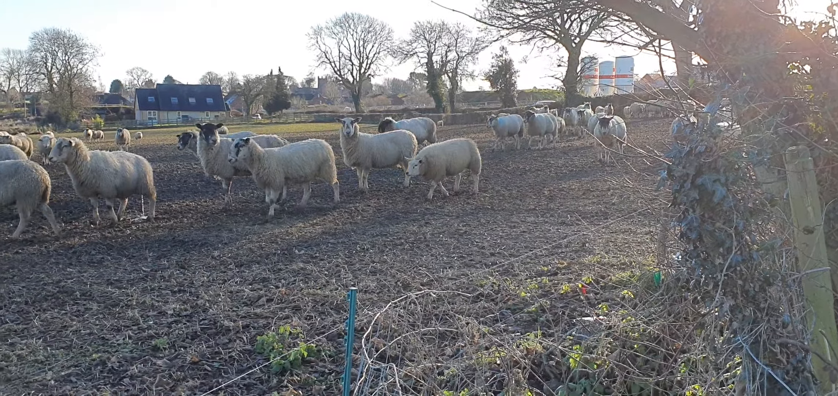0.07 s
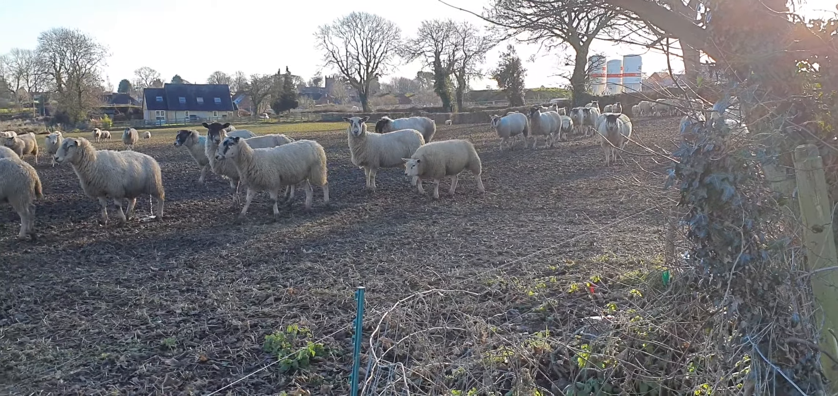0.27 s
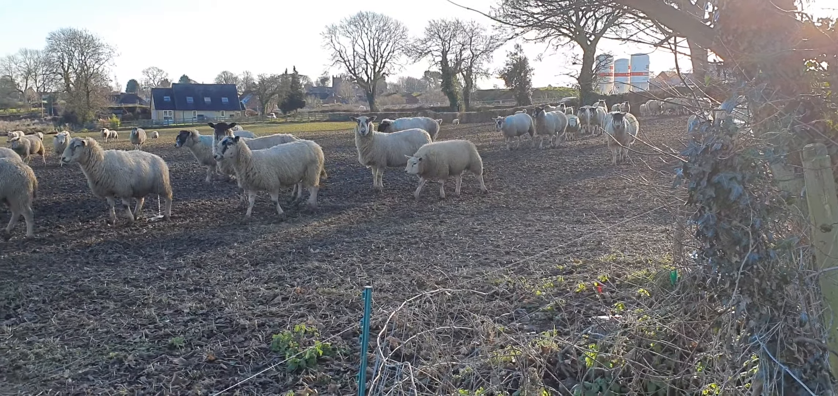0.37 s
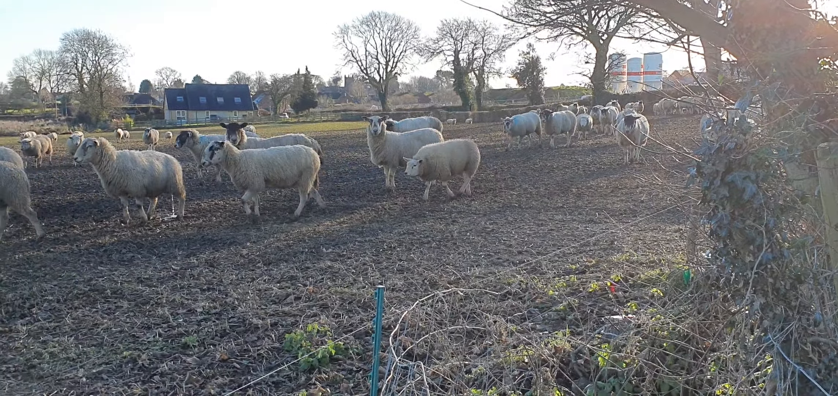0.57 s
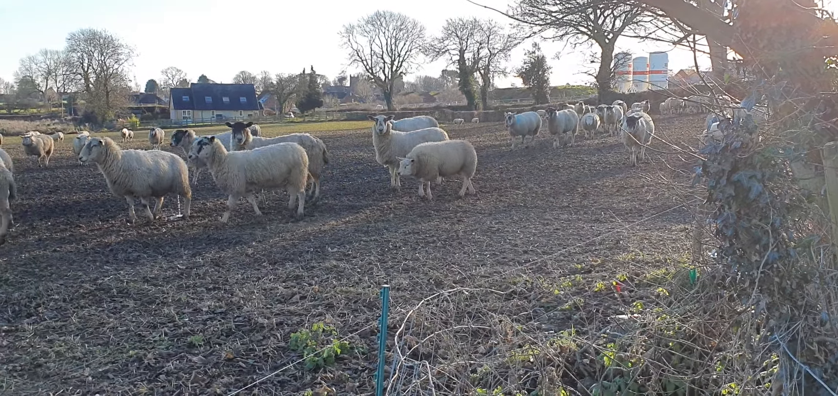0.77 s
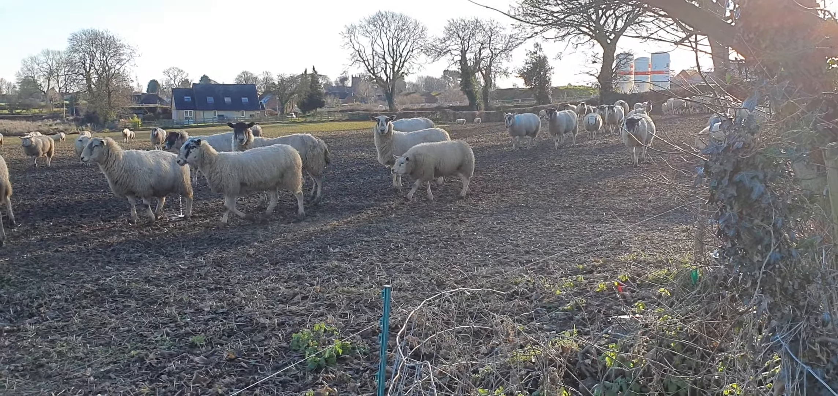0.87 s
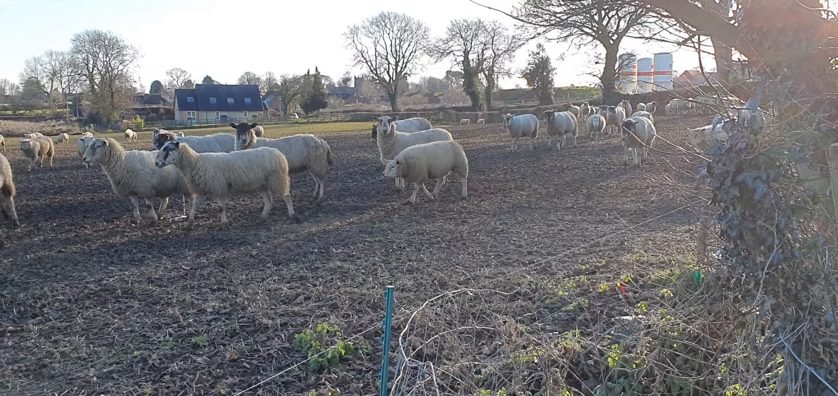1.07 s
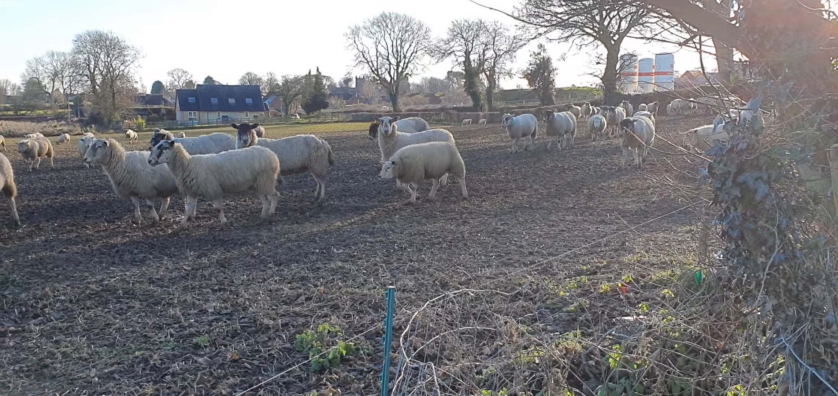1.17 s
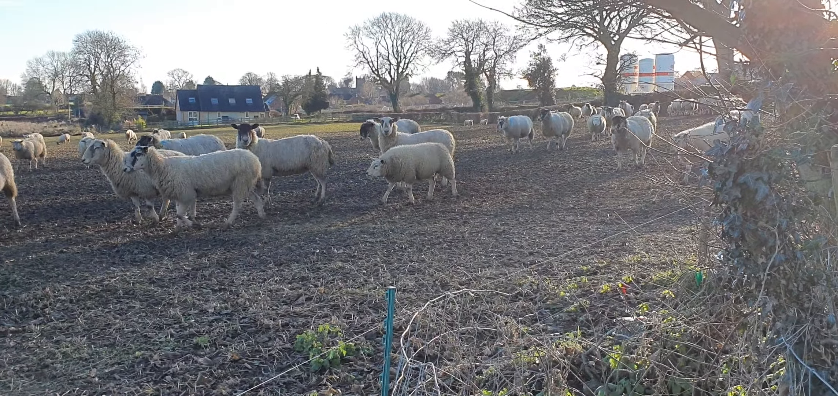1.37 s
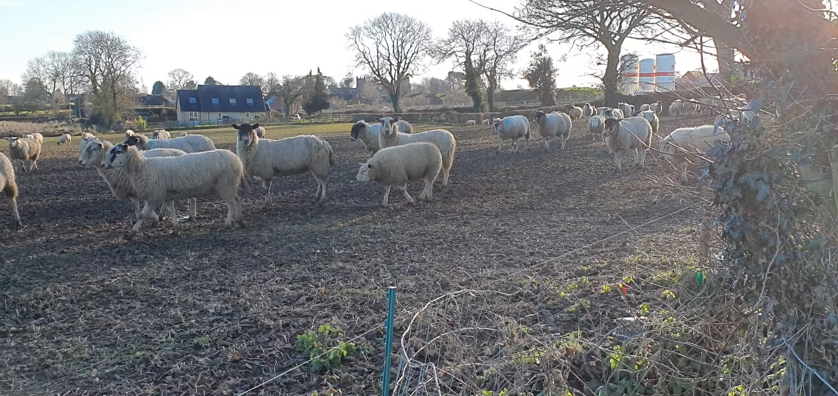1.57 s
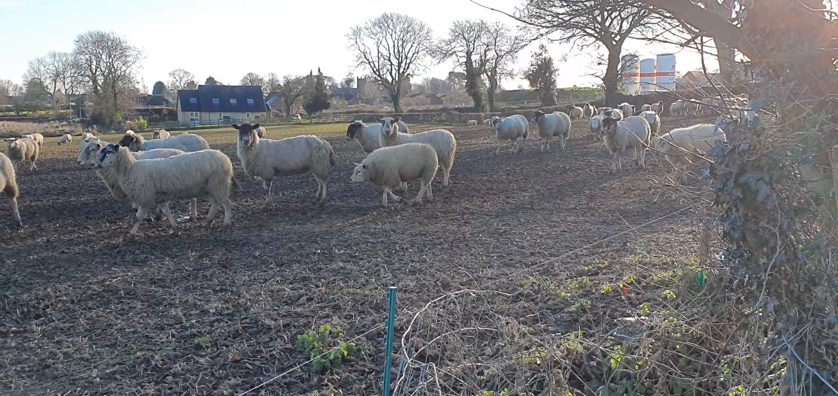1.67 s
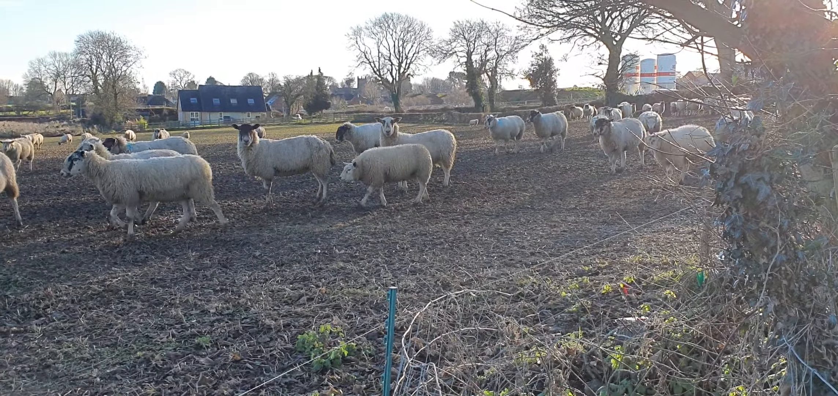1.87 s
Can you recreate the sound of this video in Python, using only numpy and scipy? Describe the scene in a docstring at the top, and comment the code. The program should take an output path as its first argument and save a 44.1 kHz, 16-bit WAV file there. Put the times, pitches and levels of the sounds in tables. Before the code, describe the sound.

A sheep bleats once in an open field, after some wind. From the start, gusts rumble on the microphone, strongest on the right with a few thumps between 0.3 and 0.7 seconds. At about 1.2 seconds the sheep hums quietly, opening at 1.4 into a buzzy bleat, briefly hoarse, held until about 1.9. Lighter gusts, faint outdoor hiss and a few tiny ticks sit underneath.

```python
"""In an open field, a sheep hums with its mouth shut, then opens it into one long, buzzy bleat.
Pulses from its voice box ring its throat and mouth, and the tone changes as the mouth opens.
From the start, gusts rumble on the microphone's two openings (ports), left and right in turn,
over a faint outdoor hiss, a dull distant wash and a few tiny ticks."""
import sys
import numpy as np
from scipy import signal
from scipy.fft import rfft, irfft, next_fast_len
from scipy.io import wavfile
from scipy.ndimage import uniform_filter1d

SR = 44100
rng = np.random.default_rng(int(sys.argv[2]) if len(sys.argv) > 2 else 0)


def wav_record(signal):
    """Record a signal, one row per channel, as 16-bit PCM in the file named by sys.argv[1]."""
    frames = np.transpose(np.atleast_2d(signal))
    bounded = np.clip(frames, -1, 1)
    # unit amplitude maps onto the largest positive 16-bit level
    quanta = np.round(bounded * 32767).astype(np.int16)
    wavfile.write(sys.argv[1], SR, quanta)


N = 83790
T = np.arange(N) / SR

# Strength of the wind at each port: time_s, level_db
GUSTS_LEFT = [(0, -34), (0.06, -55), (0.28, -36.5), (0.38, -30), (0.52, -29.5), (0.6, -39), (0.73, -32.5),
              (0.88, -37.5), (1.02, -44), (1.11, -37.5), (1.19, -48.5), (1.55, -45), (1.59, -33),
              (1.64, -44), (1.72, -40.5), (1.9, -51)]
GUSTS_RIGHT = [(0, -45), (0.15, -47), (0.22, -37), (0.245, -27), (0.3, -23.5), (0.385, -21.5),
               (0.425, -22.5), (0.46, -32.5), (0.482, -24), (0.54, -21), (0.59, -36.5), (0.64, -26),
               (0.69, -27), (0.73, -35), (0.92, -43.5), (1.0, -51.5), (1.4, -56), (1.5, -42), (1.59, -31),
               (1.66, -49), (1.9, -59.5)]
# Tone of the large and the small swirls of air: frequency_hz, gain_db
LARGE_SWIRL_TONE = [(10, -11.5), (25, -5.5), (45, -1), (66, 7), (100, -5.5), (150, -13.5), (250, -31),
                    (400, -40), (800, -63), (2000, -100)]
SMALL_SWIRL_TONE = [(50, -32), (130, 5), (250, 1.5), (370, -7.5), (480, -18.5), (650, -27), (900, -38),
                    (2000, -73), (5000, -100)]
# Tone of the outdoor hiss: frequency_hz, left_db, right_db
HISS_TONE = [(162, -2.5, -3), (354, -21.5, -14), (480, -14.5, -25.5), (846, -18.5, -15.5), (1050, -23, -38),
             (1620, -21.5, -18), (2110, -20.5, -20), (2820, -24, -38.5), (3240, -23.5, -29),
             (4740, -30, -28), (7270, -22.5, -42.5), (8210, -30, -43.5), (9070, -46, -65),
             (12050, -34.5, -51.5), (15500, -42, -64.5)]
# Tone of the distant wash: frequency_hz, gain_db
WASH_TONE = [(100, -7), (200, 5.5), (350, -0.5), (480, -9), (800, -10), (1300, -8), (2100, -10.5),
             (2700, -29.5), (6000, -48.5)]
# Loudness of the hiss and of the wash: time_s, level_db
HISS_LOUDNESS = [(0, -54), (.3, -55.5), (.6, -59), (.85, -55.5), (1.1, -59), (1.55, -52.5), (1.9, -49.5)]
WASH_LOUDNESS = [(0, -61), (.6, -64.5), (1, -58.5), (1.35, -57), (1.6, -59)]
# Ticks and scuffs nearby: start_s, level_db, centre_hz, decay_s
TICK_EVENTS = [(0.018, -58.5, 4700, 0.017), (.762, -67, 9000, 0.0058), (0.862, -61, 3600, 0.035),
               (1.005, -70, 13500, .003), (1.672, -52.5, 5370, 0.0029)]
# Hard thumps of wind: centre_s, peak_db, half_width_s
WIND_THUMPS = [(0.381, -20, 0.00088), (.405, -10, 0.0011), (.484, -17, 0.0015), (0.533, -8, 0.0036),
               (0.688, -21.5, 0.0022), (0.702, -19, 0.0022), (1.593, -24, 0.0025)]

# The sheep's note, first humming, then calling: time_s, pitch_hz
HUM_NOTE = [(1.2, 154.7), (1.39, 174.7)]
CALL_NOTE = [(1.41, 180), (1.432, 184), (1.465, 179), (1.515, 177.8), (1.57, 178.5), (1.62, 184.4),
             (1.645, 185.6), (1.674, 184.1), (1.712, 180.3), (1.752, 183.2), (1.782, 179.8), (1.816, 180),
             (1.9, 172)]
# How hoarse the voice is: time_s, roughness (0 to 1)
HOARSENESS = [(1.39, .7), (1.43, .36), (1.47, .33), (1.51, .12), (1.6, .07), (1.8, .09), (1.9, .14)]
# How hard the sheep pushes: time_s, level_db
VOICE_EFFORT = [(1.18, -78.5), (1.25, -67.5), (1.31, -60.5), (1.37, -58), (1.405, -61), (1.43, -49),
                (1.46, -48), (1.48, -50.5), (1.54, -42.5), (1.64, -40), (1.76, -40), (1.9, -43)]
# The mouth: time_s, opening (0 shut, 1 parting, 2 half open, 3 wide)
MOUTH_OPENING = [(1.405, 0), (1.43, 1), (1.53, 1), (1.62, 2), (1.77, 2.3), (1.79, 2.75), (1.85, 3)]
# How throat and mouth ring at each of those openings: frequency_hz, gain_db
SHUT_TONE = [(100, -22), (300, -17), (1000, -14), (1600, -11.5), (1850, 5.5), (2080, 1.5), (2450, -9.5),
             (2900, -2), (3290, -3.5), (3750, -29), (5700, -11), (6500, -34.5), (10000, -54)]
PARTING_TONE = [(180, -16), (360, -2.5), (540, 1.5), (720, -3), (950, -26), (1270, -6), (1420, -3),
                (1610, 8), (1790, -5), (1970, -2), (2250, -5), (2510, 11.5), (2720, 7), (2870, -12),
                (3070, 6.5), (3450, -36), (3750, -24), (4150, -24), (5900, -18.5), (7300, -30.5),
                (12000, -39)]
HALF_OPEN_TONE = [(180, -23.5), (365, -3), (550, -3), (735, -7), (930, -23), (1290, -6), (1470, -16.5),
                  (1660, 7), (1850, 3), (2210, -3), (2400, 9.5), (2580, 9.5), (2770, 2.5), (2950, 7.5),
                  (3130, -3), (3400, -16), (3750, -25), (4180, -11.5), (4500, -26.5), (4900, -10.5),
                  (5350, -42), (5850, -18), (6300, -43), (6750, -37), (9000, -44), (12000, -37),
                  (15000, -52)]
WIDE_TONE = [(180, -26), (360, -3), (530, -11.5), (705, 8.5), (900, -24), (1080, -13), (1250, -10.5),
             (1430, -2.5), (1600, 0.5), (1790, 7), (1970, -1.5), (2280, -11), (2500, 10), (2690, 8.5),
             (2870, -6), (3230, 2.5), (3450, -13), (3750, -40), (4100, -11), (4400, -26), (4950, -20),
             (6300, -23), (7250, -16.5), (9000, -73), (12000, -40), (15000, -63)]
# Boost of the high, brassy ring in the voice: time_s, gain_db
BRASS_BOOST = [(1.39, 2), (1.425, 10.5), (1.455, 0), (1.66, -3), (1.71, 1), (1.78, 1), (1.85, 1.5)]
# Echoes from a nearby tree and fence, then the field: delay_s, fade_s (to fall 60 dB), level_db
ECHOES = [(.0008, .035, -16), (.012, .3, -21)]
# The voice at one port against the other: frequency_hz, left_minus_right_db, left_phase_lead_rad
PORT_BALANCE = [(376, -8, 0), (516, 13.5, -0.2), (690, -1.5, -1.5), (880, -15.5, -2), (1230, 0, -0.6),
                (2150, -10.5, -2.15), (2407, -6.5, .5), (2614, 2, .5), (3020, -0.5, 1.33), (4130, 8, 1),
                (7000, 18, 1.5), (15000, 5.5, -1.5)]


def gain(db):
    """Turn decibels into a multiplier."""
    return 10 ** (np.asarray(db) / 20)


def unit(x):
    """Scale to an average (rms) level of 1."""
    return x / np.sqrt(np.mean(x ** 2))


def curve(rows):
    """Join (time_s, value) rows by straight lines."""
    return np.interp(T, *np.array(rows, float).T)


def noise():
    """White noise at level 1."""
    return rng.standard_normal(N)


def colour(x, tone):
    """Filter a sound through (frequency_hz, gain_db) points."""
    size = 2 * next_fast_len(N)
    hz, db = np.array(tone, float).T
    grid_hz = np.maximum(np.arange(size // 2 + 1) * SR / size, 1)
    grid_db = np.interp(np.log(grid_hz), np.log(hz), db)
    cepstrum = irfft(np.log(gain(grid_db)))
    # Folding this in half makes the filter ring only after a sound, never before.
    cepstrum[1:size // 2] *= 2
    cepstrum[size // 2 + 1:] = 0
    return irfft(rfft(x, size) * np.exp(rfft(cepstrum)))[:N]


def drift(rate_hz):
    """A smooth random wander, about 1 in size."""
    hold = int(SR / rate_hz)
    steps = noise()[np.arange(N) // hold]
    return unit(uniform_filter1d(uniform_filter1d(steps, hold), hold))


def steady(x, span_s):
    """Hold a noise near level 1 over every short span."""
    return x / np.sqrt(uniform_filter1d(x ** 2, int(span_s * SR)))


def wind(gusts):
    """Swirling air rumbles at one port; small swirls grow faster than large ones as a gust rises."""
    gust_db = curve(gusts)
    strong_wind_db, growth = -21.5, 0.91
    small_db = -6.5 + growth * (gust_db - strong_wind_db)
    large = gain(2) * steady(colour(noise(), LARGE_SWIRL_TONE), span_s=0.0465)
    small = gain(small_db) * steady(colour(noise(), SMALL_SWIRL_TONE), span_s=0.032)
    return gain(gust_db) * (large + small)


def outdoor_hiss():
    """A faint hiss that flickers slightly and is brighter on the left."""
    rows = np.array(HISS_TONE, float)
    flicker_db = 2
    ports = [colour(noise(), rows[:, [0, side]]) * gain(flicker_db * drift(rate_hz=18.44))
             for side in (1, 2)]
    return unit(np.array(ports)) * gain(curve(HISS_LOUDNESS))


def distant_wash():
    """Dull noise from the far countryside, partly the same at both ports."""
    shared = noise()
    ports = [unit(colour(shared + noise(), WASH_TONE)) for _ in range(2)]
    return np.array(ports) * gain(curve(WASH_LOUDNESS))


def ticks():
    """Dry ticks and scuffs: bursts of noise that die fast, about as loud on both sides."""
    out = np.zeros((2, N))
    spread, right_db = 2 ** 0.6, 0.5  # the band's shoulders lie 0.6 octaves from its centre
    for start, db, hz, decay in TICK_EVENTS:
        band = [(hz / 8, -45), (hz / spread, -6), (hz, 0), (hz * spread, -9), (hz * 4, -40)]
        fade = gain(db) * (T >= start) * np.exp(-abs(T - start) / decay)
        out += fade * np.array([unit(colour(noise(), band)) * gain(side) for side in (0, right_db)])
    return out


def wind_thumps():
    """Single swirls strike the right port: each one pulls, pushes, then pulls."""
    right = np.zeros(N)
    for centre, db, half_width in WIND_THUMPS:
        away_squared = ((T - centre) / half_width) ** 2
        right += gain(db) * (1 - away_squared) * np.exp(-away_squared / 2)
    return np.array([np.zeros(N), right])


def voice_box():
    """The voice box gives one sharp pulse and a puff of air per cycle, unevenly when hoarse."""
    pitch_wobble, strength_wobble_db, puff_cycles = 0.03, 2.2, 0.43
    rough = np.clip(curve(HOARSENESS), 0, 1)
    hz = curve(list(HUM_NOTE) + list(CALL_NOTE))
    cycle = np.cumsum(hz / SR).astype(int)
    hz = hz * (1 + pitch_wobble * rough * noise()[cycle])
    phase = np.cumsum(hz / SR)
    starts = np.flatnonzero(np.diff(np.floor(phase))) + 1
    wobble_db = strength_wobble_db * rough[starts] * noise()[:len(starts)]
    strength = gain(wobble_db) * np.sqrt(SR / hz[starts])
    # Draw each pulse over a few samples, so it can fall between two of them.
    taps = np.arange(-8, 9)
    offset = taps + (phase[starts] % 1 * SR / hz[starts])[:, None]
    spikes = strength[:, None] * np.sinc(offset) * np.hanning(len(taps))
    pulses = np.zeros(N)
    np.add.at(pulses, np.clip(starts[:, None] + taps, 0, N - 1), spikes)
    puffs = unit(np.exp(-(phase % 1) / puff_cycles))
    # Air rushing through the throat hisses above 6800 Hz.
    hiss = signal.sosfilt(signal.butter(4, 6800, "high", fs=SR, output="sos"), noise())
    rasp = gain(-9) * rough * noise()
    return pulses + puffs * (rasp + gain(-7) * hiss)


def bleat():
    """The pulses ring the throat, whose tone shifts as the mouth opens; a brassy ring comes and goes."""
    tones = (SHUT_TONE, PARTING_TONE, HALF_OPEN_TONE, WIDE_TONE)
    waver_db, brass_hz = 2, 2780
    buzz = voice_box()
    mouth = np.clip(curve(MOUTH_OPENING), 0, len(tones) - 1)
    voice = np.zeros(N)
    for opening, tone in enumerate(tones):
        share = np.maximum(1 - abs(mouth - opening), 0)
        voice += share * unit(colour(buzz, tone))
    for hz in (720, 1900, 2450):  # these bands waver in level at random
        ring = signal.lfilter(*signal.iirpeak(hz, Q=6, fs=SR), voice)
        voice += ring * (gain(waver_db * drift(rate_hz=28)) - 1)
    brass = signal.lfilter(*signal.iirpeak(brass_hz, Q=8, fs=SR), voice)
    voice += brass * (gain(curve(BRASS_BOOST)) - 1)
    return voice * gain(curve(VOICE_EFFORT))


def smear(voice):
    """Paths of nearly equal length spread each pulse in time without changing its tone."""
    gap_s, share = 0.0009, 0.42
    gap = np.zeros(int(gap_s * SR))
    return signal.lfilter(np.r_[-share, gap, 1], np.r_[1, gap, -share], voice)


def across_field(voice):
    """Tree, fence and ground scatter the call, and the microphone's case shades each port."""
    lag_s = 0.00062  # the call reaches the left port first
    late = np.pad(voice, (int(lag_s * SR), 0))[:N]
    hz, balance_db, lead = np.array(PORT_BALANCE, float).T
    balance = np.interp(np.fft.rfftfreq(2 * N, 1 / SR), hz, np.log(gain(balance_db)) + 1j * lead)
    ports = []
    for sign, direct in ((1, voice), (-1, late)):  # left, then right
        heard = direct
        for delay, fade_s, db in ECHOES:
            tail = noise() * np.exp(-np.log(1000) * T / fade_s) * (T > delay)
            heard = heard + gain(db) * signal.fftconvolve(direct, tail / np.linalg.norm(tail))[:N]
        shading = np.exp(sign * balance / 2)
        ports.append(irfft(rfft(heard, 2 * N) * shading)[:N])
    return np.array(ports)


def scene():
    """Sheep, wind and background together, left and right."""
    sheep = across_field(smear(bleat()))
    gusts = np.array([wind(GUSTS_LEFT), wind(GUSTS_RIGHT)])
    return sheep + gusts + wind_thumps() + outdoor_hiss() + distant_wash() + ticks()


def record(dry):
    """Cut away the very highest treble."""
    top_hz = 15750
    return signal.sosfilt(signal.ellip(10, .2, 80, top_hz, fs=SR, output="sos"), dry)


dry = scene()
out = record(dry)
wav_record(out)
```